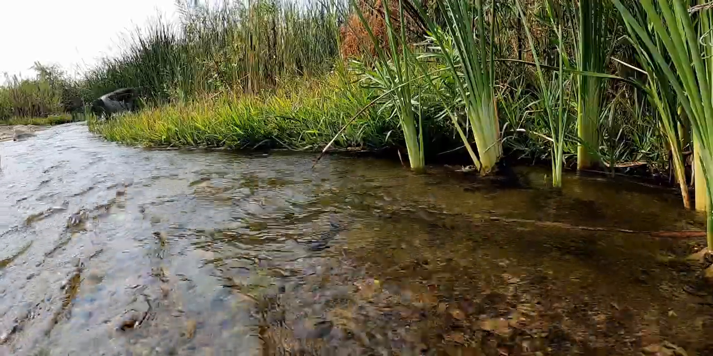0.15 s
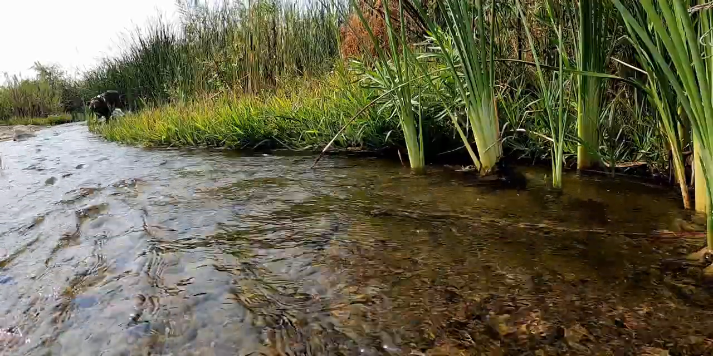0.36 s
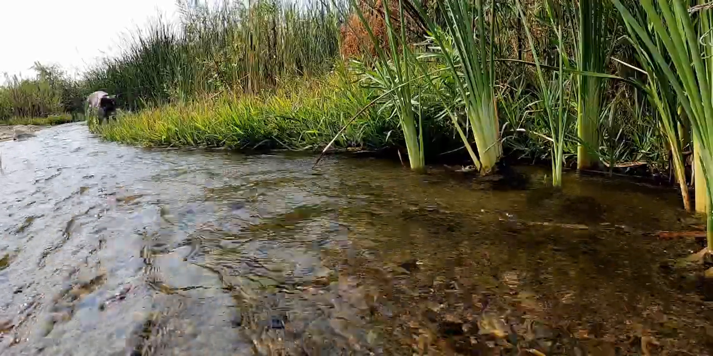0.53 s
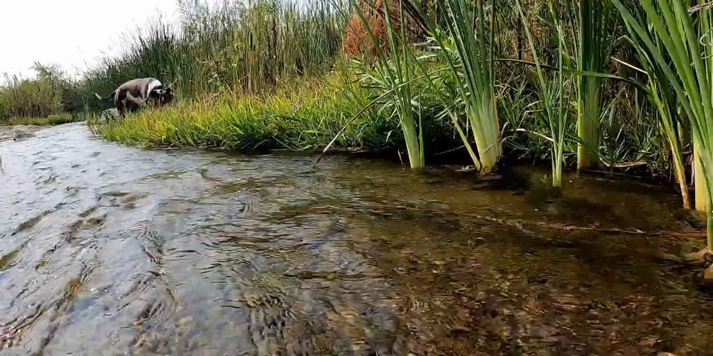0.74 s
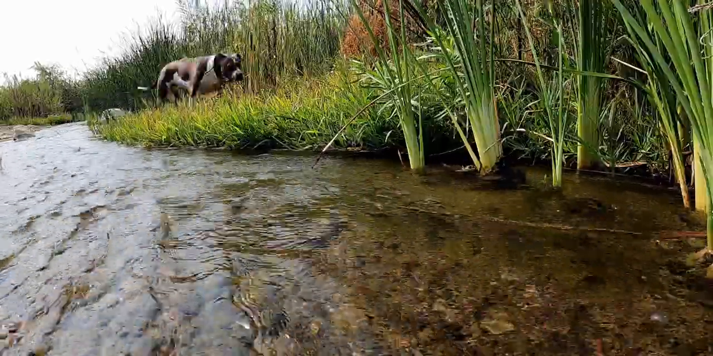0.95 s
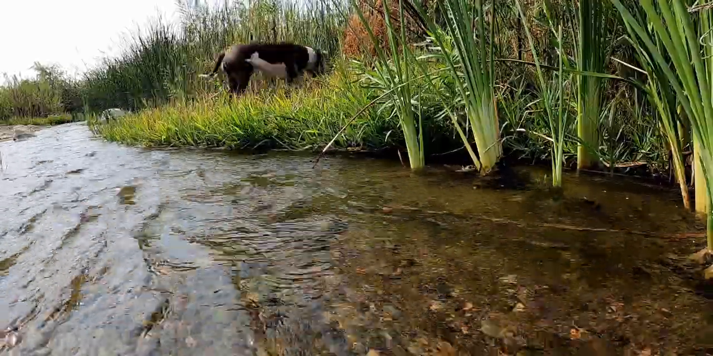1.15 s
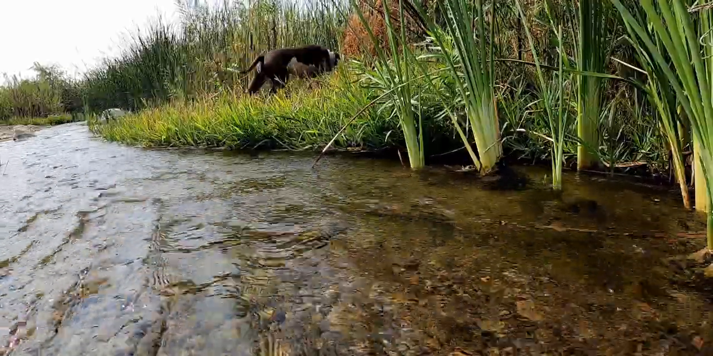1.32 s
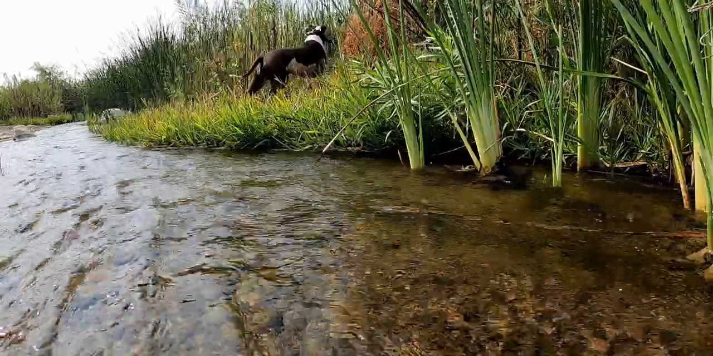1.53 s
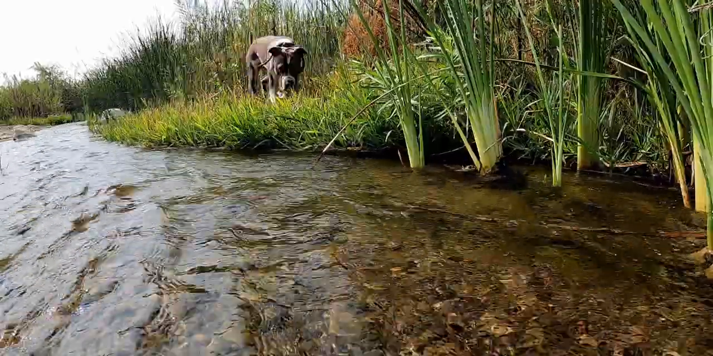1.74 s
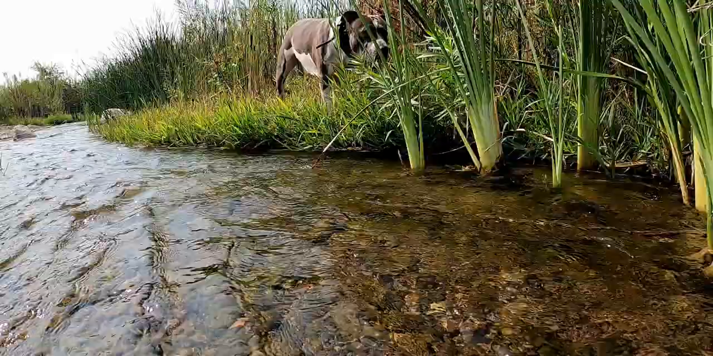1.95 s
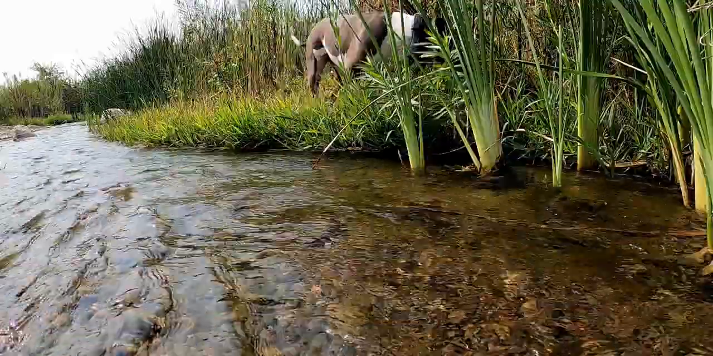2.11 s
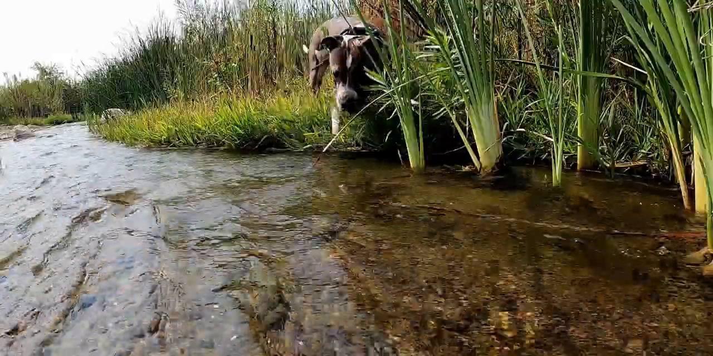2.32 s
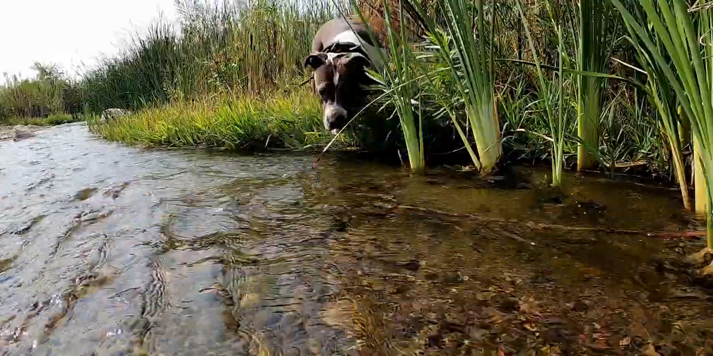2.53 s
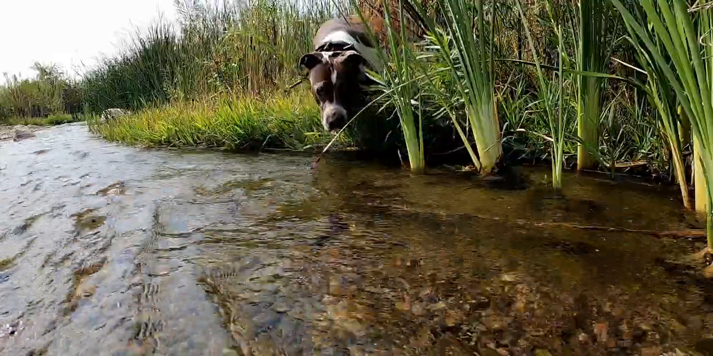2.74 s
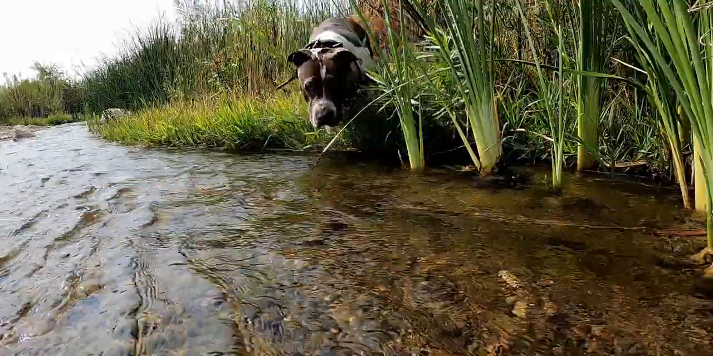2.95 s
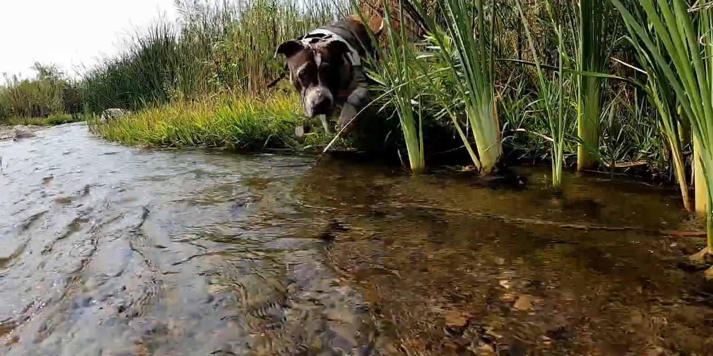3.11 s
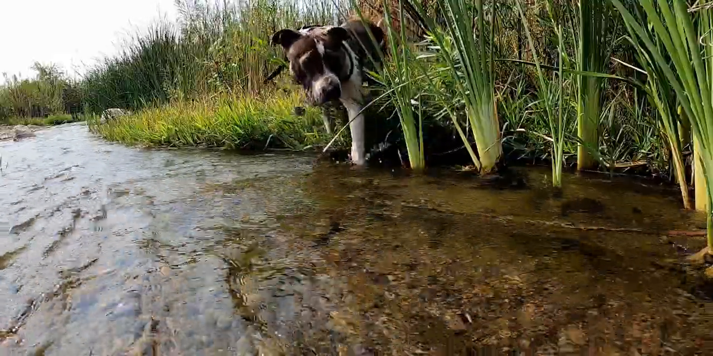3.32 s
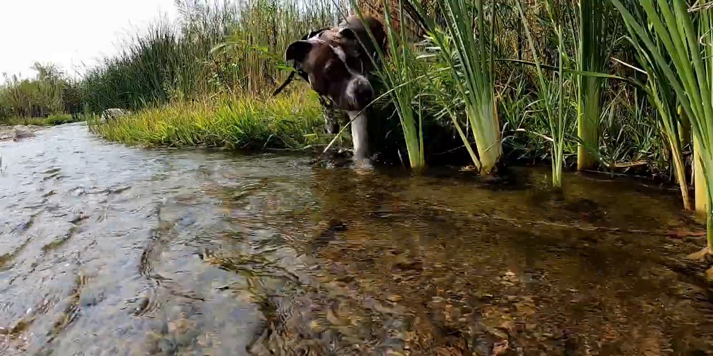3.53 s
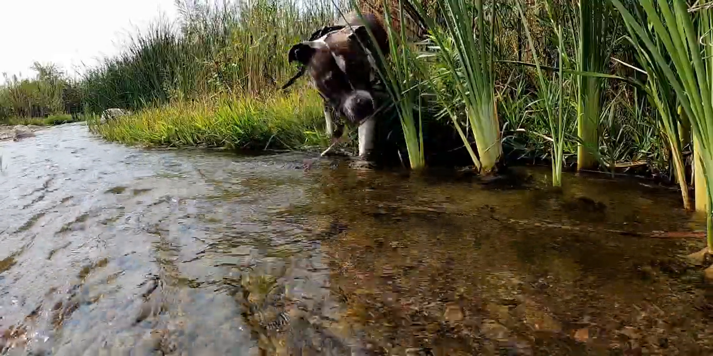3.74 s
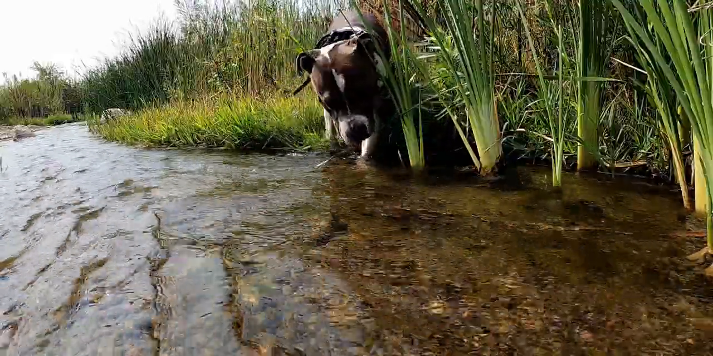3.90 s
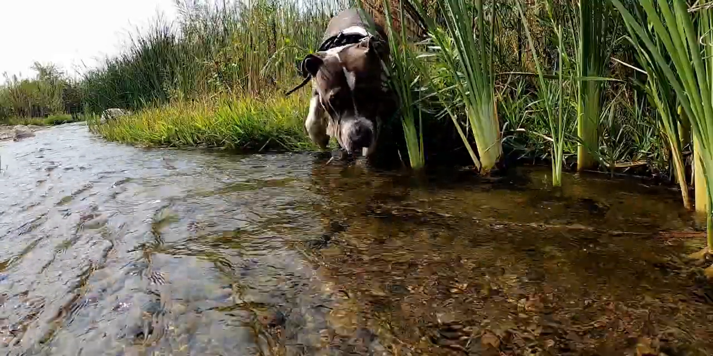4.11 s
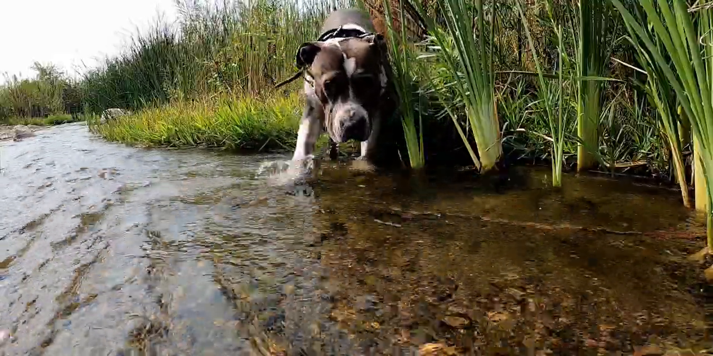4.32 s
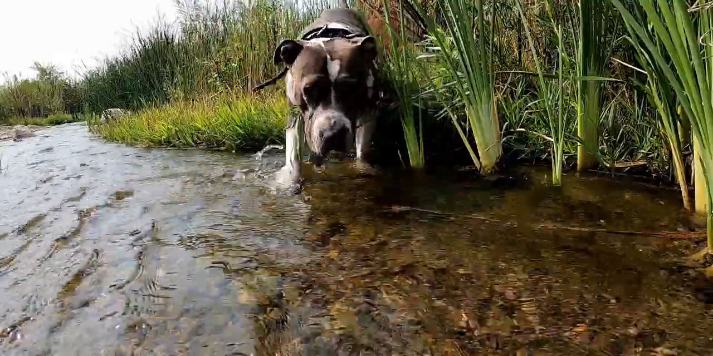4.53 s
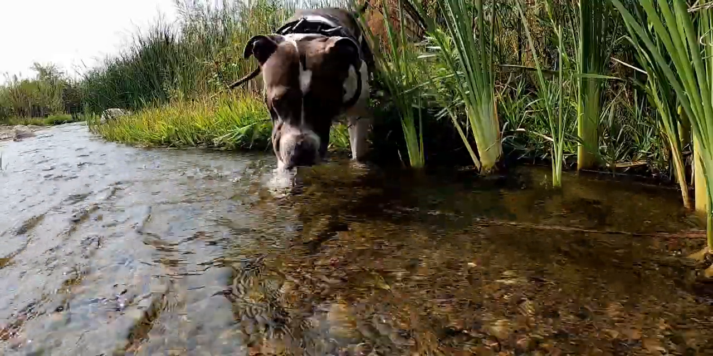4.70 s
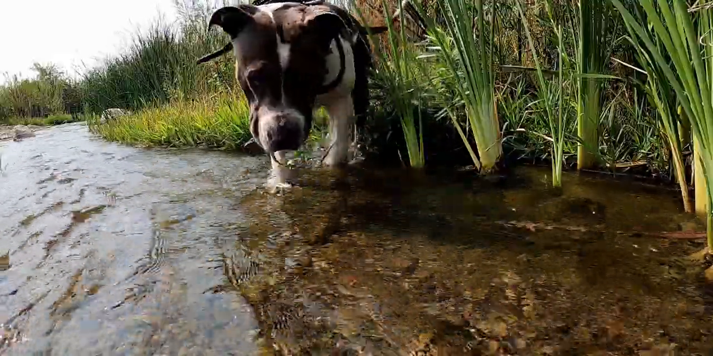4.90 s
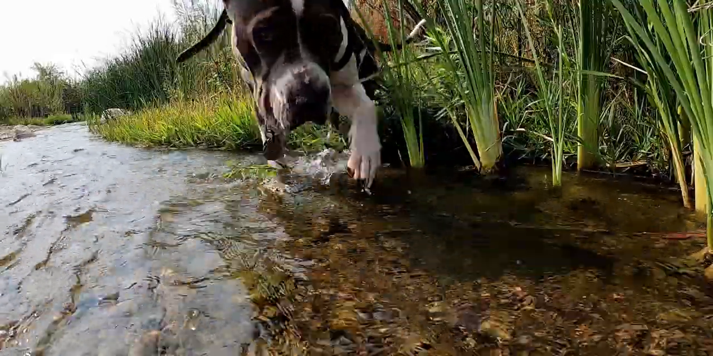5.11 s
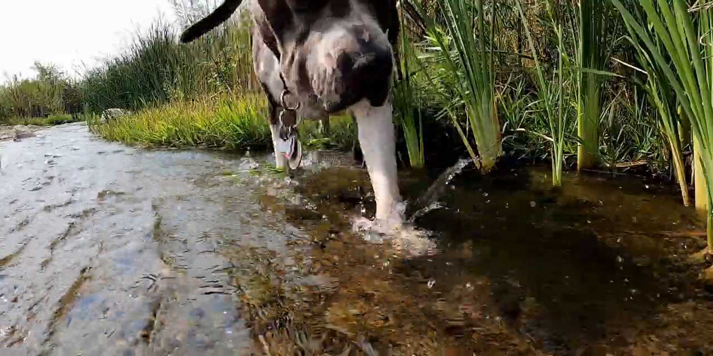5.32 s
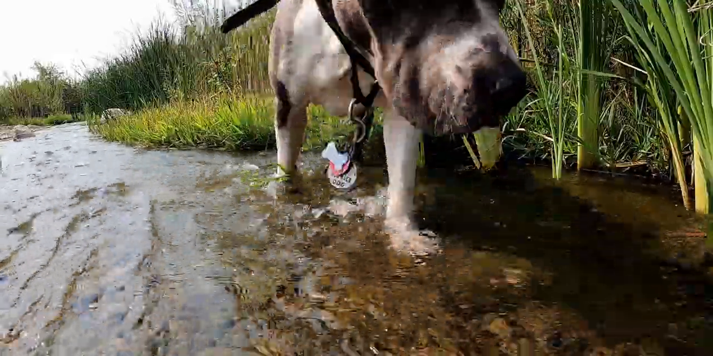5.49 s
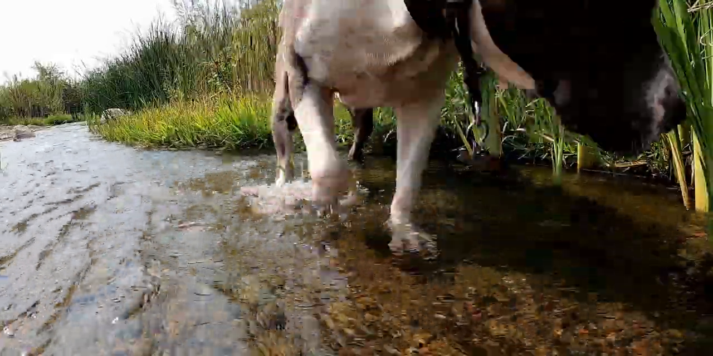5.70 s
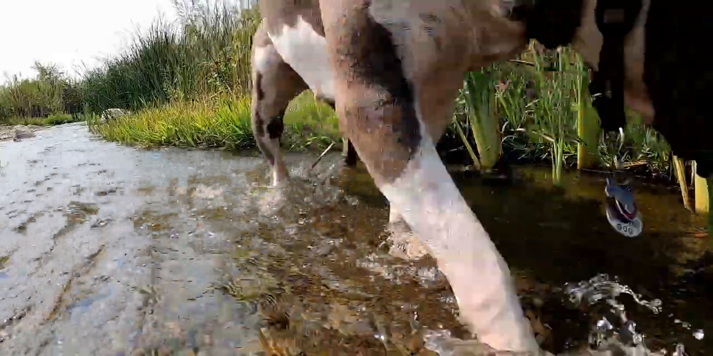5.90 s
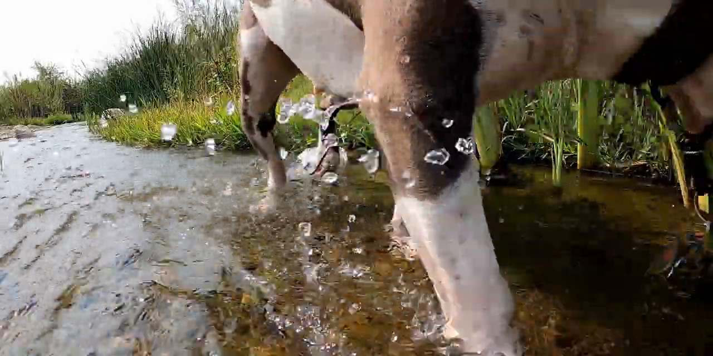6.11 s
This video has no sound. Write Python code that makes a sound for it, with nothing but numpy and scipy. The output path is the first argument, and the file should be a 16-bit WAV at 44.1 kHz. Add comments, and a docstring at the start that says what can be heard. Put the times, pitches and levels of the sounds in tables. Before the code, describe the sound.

Close outdoor pickup at the edge of a stony stream. Quiet trickling water and light early drips give way to grass and reeds being brushed, with soft wind bumps. Thin high tag jingles appear, then wet paw steps with popping bubbles, gurgles and crisp spray. Short lulls separate the first steps before the dog wades past in continuous, loud splashing.

```python
"""A shallow creek murmurs over stones (shaped noise and faint ringing bubbles) above a low wavering hum.
At first a dog's paws stir the water in sparse surges and plops; from about 0.9 s it brushes wet reeds,
and a light breeze thumps the microphone with short low swings. From 2.4 s its collar tag rings now and then
(damped high sines), and from 3.3 s it wades nearer: ringing bubbles, slosh and spray (clumped bubble
swarms and noise) grow until the end."""
import sys
import numpy as np
from scipy import signal
from scipy.fft import rfft, irfft, next_fast_len
from scipy.io import wavfile
from scipy.ndimage import uniform_filter1d, map_coordinates

SR = 44100
rng = np.random.default_rng(int(sys.argv[2]) if len(sys.argv) > 2 else 0)


def master_out(mix):
    """Clip the mix to full scale and print it as 16-bit PCM to the path in sys.argv[1]."""
    frames = np.transpose(np.atleast_2d(mix))
    ceiling = np.clip(frames, -1, 1)
    pcm = np.round(ceiling * 32767).astype(np.int16)
    wavfile.write(sys.argv[1], SR, pcm)


N = 271215  # length [samples]


def amp(db):
    """Gain of a level in dB."""
    return 10 ** (np.asarray(db) / 20)


def unit(x):
    """x at rms 1."""
    return x / np.sqrt(np.mean(x ** 2) + 1e-20)


def curves(rows):
    """One value per sample for each column after the time."""
    s, *cols = np.transpose(rows)
    return [np.interp(np.arange(N) / SR, s, col) for col in cols]


def wobble(rate):
    """A smooth random curve with `rate` knots a second."""
    knots = rng.standard_normal(int(N * rate / SR) + 4)
    return map_coordinates(knots, [np.arange(N) * rate / SR])


def filtered(x, response):
    """x times a response of frequency."""
    m = next_fast_len(N + 8192)
    gain = response(np.fft.rfftfreq(m, 1 / SR))
    return irfft(rfft(x, m) * gain, m)[..., :N]


def coloured(x, points):
    """x shaped by a (Hz, dB) curve, drawn on a log frequency axis, at rms 1."""
    f, db = np.transpose(points)
    return unit(filtered(x, lambda hz: amp(np.interp(np.log(hz + 1), np.log(f), db))))


def rush(points, patchy_db):
    """Shaped noise with patches of random gain in time and frequency."""
    z = signal.stft(rng.standard_normal(N), nperseg=256)[2]
    field = rng.standard_normal(z.shape)
    field = uniform_filter1d(uniform_filter1d(field, 5, 0), 9, 1)  # smooth over frequency, then time
    patchy = signal.istft(z * amp(patchy_db * unit(field)), nperseg=256)[1][:N]
    return coloured(patchy, points)


def rings(s, hz, db, t60, rise, size, onset=0.22, life=1):
    """Damped sines whose pitch can climb, as a bubble's does near the surface; they die faster after life [s]."""
    burst_t60 = 0.031  # s, decay added once a pocket has burst
    t = np.arange(size) / SR
    hz, db, t60, rise, onset, life = (np.reshape(v, (-1, 1)) for v in (hz, db, t60, rise, onset, life))
    turns = hz * t * (1 + 2.25 * np.clip(rise, 0, 3) * t / t60)
    fade_db = 60 * (t / t60 + np.maximum(t - life, 0) / burst_t60)
    attack = 1 - np.exp(-hz * t / onset)  # onset in cycles of the starting pitch
    wave = amp(db - fade_db) * np.sin(2 * np.pi * turns) * attack
    at = np.round(np.asarray(s) * SR).astype(int)[:, None] + np.arange(size)
    return np.bincount(at.ravel(), wave.ravel(), N + size)[:N]


def grains(count, hz, spread, cycles, scatter_db, size, rise=0.095):
    """A swarm of bubbles ringing at random moments, a few much louder than the rest, at rms 1."""
    when, loud, place = rng.random((count, 3)).T
    pitch = hz * np.exp(spread * (2 * place - 1))
    level_db = -scatter_db * np.log(loud + .02)
    return unit(rings(when * (N - 1) / SR, pitch, level_db, cycles / pitch, 0 * pitch + rise, size, onset=1.1))


def bursts(rows, t60):
    """White noise that starts within a millisecond or so and dies fast, for each (s, dB) row."""
    out, t = np.zeros(N + 2000), np.arange(2000) / SR
    for s, db in rows:
        envelope = amp(db - 60 * t / t60) * (1 - np.exp(-t / 0.001))
        out[round(s * SR):][:2000] += envelope * rng.standard_normal(2000)
    return out[:N]


def hum():
    """A faint low sine that wavers in pitch and comes and goes."""
    pitch_hz = 172 * np.exp(.08 * wobble(4) + .05 * wobble(30))
    return amp(-71.5 + 4.5 * wobble(9)) * np.sin(2 * np.pi * np.cumsum(pitch_hz) / SR)


def breeze():
    """Each push of air swings the microphone diaphragm out and back: a short low sine in a bell-shaped swell."""
    # air pushes: (centre time [s], envelope peak level [dB], pitch [Hz])
    puffs = [(0.955, -37.5, 63.2), (0.994, -46, 49.7), (2.064, -40.5, 71.6), (2.132, -31.5, 114),
             (2.159, -42.5, 48.7), (2.634, -39.5, 27.8), (2.679, -48, 33), (2.765, -53, 32),
             (2.98, -49, 31.8), (4.754, -49.5, 85)]
    puff_cycles = 1.33  # width of the swell where it is down to 1/e
    out, t = np.zeros(N), np.arange(N) / SR
    for s, db, hz in puffs:
        swell = np.exp(-(2 * hz * (t - s) / puff_cycles) ** 2)
        out += amp(db) * swell * np.sin(2 * np.pi * hz * (s - t))
    return out


def creek():
    """Running water: deep patchy noise murmurs, brighter noise hisses as ripples, faint bubbles ring."""
    # the flow over time: (time [s], murmur level [dB], ripple level [dB])
    flow = [(0, -60, -69), (.3, -71, -70), (.6, -63.5, -66), (1.5, -67, -66.5), (3.4, -64, -60),
            (4.2, -67.5, -64), (6.15, -62.5, -49)]
    # spectrum of the deeper water: (frequency [Hz], relative level [dB])
    deep = [(15, -66), (30, -3.5), (90, -10.5), (170, -1.5), (280, -6.5), (450, -20.5), (900, -58)]
    # spectrum of the ripple hiss: (frequency [Hz], relative level [dB])
    ripple_tone = [(300, -22), (600, 2.5), (850, 0.5), (1100, 5.5), (3200, 2.5), (7200, -3.5), (8500, -12),
                   (16000, -29)]
    murmur_db, ripple_db = curves(flow)
    murmur = amp(murmur_db + 1.8 * wobble(6)) * rush(deep, patchy_db=2.5)
    bubbles = grains(count=160, hz=1500, spread=.7, cycles=45, scatter_db=3.4, size=1200, rise=.35)
    ripples = rush(ripple_tone, patchy_db=1.5) + .5 * bubbles
    return murmur + amp(ripple_db + 1.26 * wobble(6.0)) * ripples


def banks(x):
    """Reeds and banks scatter a short, diffuse answer: a delayed noise tail with a t60 of 35 ms."""
    t = np.arange(SR // 8) / SR
    tail = rng.standard_normal(len(t)) * amp(-60 * t / 0.035)
    return signal.fftconvolve(np.pad(x, (120, 0)), tail / np.linalg.norm(tail))[:N]


def ticks():
    """Reed stems and flying drops tick: dry noise bursts kept to the treble."""
    # sharp ticks: (time [s], level before filtering [dB])
    tick_rows = [(0.339, -36), (0.698, -27.5), (1.0034, -34), (2.4089, -32.5), (2.9633, -24), (2.994, -20),
                 (3.0091, -19), (3.177, -17), (3.395, -21), (3.6057, -14), (4.082, -28.5), (4.248, -14),
                 (4.526, -23), (4.5345, -13), (5.053, -18), (5.258, -10.5), (5.541, -21.5)]
    clicks = bursts(tick_rows, t60=.011)
    return filtered(clicks, lambda f: (f / 4000) ** 2 / (1 + (f / 4000) ** 2) / (1 + (f / 8000) ** 6))


def collar():
    """Each strike clicks and rings the thin metal tag; its swinging makes the ring waver."""
    # tag strikes: (time [s], base level of ring and click [dB])
    strikes = [(2.427, -72), (3.1053, -51.5), (3.1797, -62), (3.273, -51.5), (4.2423, -62), (4.727, -52.5),
               (6.114, -48)]
    # modes of the tag: (pitch [Hz], level relative to the strike [dB], t60 [s])
    modes = [(8945, 5.5, .2), (15050, -20, .18)]
    # a smaller metal piece rings once: (time [s], pitch [Hz], starting level [dB], t60 [s])
    ping = (3.182, 5640, -42, .07)
    s, level = np.transpose(strikes)
    ring = sum(rings(s, hz + 0 * s, level + db, t60 + 0 * s, 0 * s, size=9000) for hz, db, t60 in modes)
    swing = amp(2.8 * wobble(60))
    click = filtered(bursts(strikes, t60=0.01), lambda f: f / (f + 5000) / (1 + (f / 11000) ** 5))
    return swing * ring + amp(28.0) * click + rings(*np.transpose([ping]), [0], size=4000)


def drops():
    """Slaps plop briefly, trapped bubbles ring on, and air pockets climb in pitch until they burst."""
    # flung water slapping the surface: (time [s], pitch [Hz], starting level [dB])
    slaps = [(.341, 3550, -34), (0.529, 3000, -30.5), (0.578, 1635, -30.5), (.666, 1040, -32.5),
             (.675, 2090, -27.5), (0.699, 2100, -26), (0.7, 3400, -23), (.744, 1390, -36),
             (1.038, 418, -46.5), (1.198, 4000, -43), (2.716, 647, -41.5), (2.73, 2870, -33),
             (2.1847, 3450, -29.5), (3.277, 3500, -18), (3.2962, 2770, -26), (3.3753, 937, -25.5),
             (3.4195, 2260, -14.5), (3.517, 2730, -14), (3.607, 1770, -16), (3.71, 1610, -38),
             (4.4145, 1880, -15.5), (4.467, 1060, -18), (4.478, 1120, -21), (4.489, 1250, -16),
             (4.499, 1420, -13), (4.621, 1575, -25.5), (4.998, 1090, -19), (5.04, 3490, -14),
             (5.114, 1200, -25), (5.125, 920, -18), (5.131, 1780, -16.5), (5.155, 2830, -16.5),
             (5.2532, 2700, -12.5), (5.2961, 1288, -12.5), (5.3277, 1290, -13), (5.3529, 1200, -13.5),
             (5.3535, 2480, -9), (5.36, 630, -16.5), (5.4501, 2930, -6), (5.562, 2530, -22.5),
             (5.6035, 3460, -10.5), (5.611, 2610, -15), (5.673, 918, -22), (5.6939, 1420, -11.5),
             (5.743, 843, -17), (5.795, 490, -27), (5.821, 940, -13.5), (5.82, 493, -20.5),
             (5.8342, 395, -24), (5.841, 996, -23), (5.874, 3210, -12), (5.898, 2010, -24),
             (5.977, 1640, -13), (5.996, 557, -19.5), (6.0341, 996, -9.5), (6.035, 366, -21.5),
             (6.0367, 3600, -8.5), (6.043, 1720, -9), (6.087, 3240, -4), (6.091, 3150, -10.5)]
    # trapped bubbles that ring on: (time [s], pitch [Hz], starting level [dB])
    trapped = [(0.414, 1025, -44), (0.4971, 1740, -31), (1.42, 1350, -51.5), (2.507, 498, -47.5),
               (2.508, 1510, -43), (3.027, 1300, -40.5), (3.3176, 2357, -32), (3.339, 1040, -41),
               (3.4195, 2270, -20), (3.58, 1400, -36.5), (3.614, 1890, -19), (3.678, 980, -36.5),
               (3.718, 1670, -38), (3.862, 718.5, -46.5), (4.2655, 2200, -31.5), (4.296, 1535, -33),
               (4.329, 3050, -23.5), (4.534, 3460, -29), (4.9468, 1005, -29.5), (5.004, 960, -29.5),
               (5.269, 2850, -21), (5.6109, 1604, -19), (5.866, 485, -36), (5.926, 1164, -31),
               (5.997, 2770, -19), (6.0137, 999, -21.5), (6.105, 1050, -29), (6.1114, 4090, -17.5)]
    # air pockets closing behind a paw: (time [s], starting pitch [Hz], starting level [dB], t60 [s],
    # pitch rise while fading 13 dB [share], life until it bursts [s])
    gulps = [(.403, 1300, -46.5, 0.057, .5, 0.0092), (0.71, 680, -38, 0.084, 1.5, 0.0084),
             (1.981, 1026, -51.5, 0.142, 0.5, .04), (3.51, 1247, -35, 0.092, 1.3, 0.0084),
             (3.727, 480, -33, 0.19, 0.35, 0.056), (3.801, 798, -30, 0.1, 1.2, 0.016),
             (5.035, 447.4, -27.5, 0.048, 1.3, .02), (5.07, 780, -34, 0.21, 0, 0.024),
             (5.162, 752, -28.5, 0.194, 1.45, 0.022), (5.35, 240, -24.5, 0.13, 0, 0.082),
             (5.414, 596, -29, 0.14, 1.0, 0.031), (5.629, 599, -30, 0.11, 0.3, 0.0324)]
    slap_cycles, bubble_cycles = 15, 45  # cycles until 60 dB down
    s, hz, db = np.transpose(slaps + trapped)
    t60 = np.repeat([slap_cycles, bubble_cycles], [len(slaps), len(trapped)]) / hz
    out = rings(s, hz, db, t60, 0 * s + 0.017, size=2000, onset=0.9)
    # each drags three quieter, mostly higher bubbles after it
    for late, pitch, quiet in rng.random((len(s), 3, 3)).T:
        small_hz = hz * (.8 + 1.3 * pitch)
        small_db = db - 13.5 - 9 * quiet
        out += rings(s + 0.0084 * late, small_hz, small_db, 18 / small_hz, 0 * s + 0.08, size=1200)
    *pocket, rise, life = np.transpose(gulps)
    swell = 0.77 + 4 * rise  # cycles: the faster a pocket rises, the later it is loudest
    shaken = amp(2.5 * wobble(130))  # the surface above a pocket never lies still
    return out + shaken * rings(*pocket, rise, size=7000, onset=swell, life=life)


def surges():
    """Strength of slosh, gurgle and spray: each surge swells, holds, then settles; long ones do so slowly."""
    # paws and legs stirring the water; deep plunges gurgle most:
    # (time of full strength [s], hold [s], slosh level before mixing [dB], gurgle relative to slosh [dB])
    splashes = [(0.386, 0.063, -61.5, -6.5), (0.494, 0.016, -53, -1.5), (0.577, 0.037, -58.5, 1),
                (0.664, 0.00465, -50, 5), (0.738, 0.04, -51.5, -19.5), (1.222, 0.017, -58.5, -7),
                (1.305, 0.014, -57, -7.5), (2.584, 0.014, -56, 3.5), (2.668, 0.0562, -59.5, 0),
                (3.289, 0.03, -47, -14), (3.4, 0.14, -51.5, -10), (3.61, 0.0071, -36.5, -30),
                (3.658, 0.083, -53.5, -7), (4.248, 0.018, -44, -44), (4.289, 0.025, -43.5, -36),
                (4.337, 0.0526, -41.5, -49.5), (4.412, 0.014, -42, 1.5), (4.491, 0.015, -39, 4.5),
                (4.497, 0.24, -53.5, 1.5), (4.938, 0.036, -38.5, -12.5), (5.009, 0.059, -41.5, 4),
                (5.104, 0.068, -40, -1.5), (5.22, 0.099, -40.5, -41), (5.257, 0.03, -32.5, -7.5),
                (5.345, 0.012, -41.5, 11), (5.378, 0.055, -43.5, -1.5), (5.513, 0.039, -42.5, -23),
                (5.602, 0.012, -32.5, -21), (5.665, 0.1375, -41.5, 1.5), (5.855, 0.07, -30.5, -44),
                (5.942, 0.051, -34.5, -16), (6.05, 0.022, -45, 5.5), (6.1, 0.054, -47, 3)]
    # wet reeds brushed by the dog:
    # (time of full strength [s], hold [s], level before mixing [dB], treble relative to that [dB])
    rustles = [(0.885, 0.029, -60, -5.5), (1.682, 0.067, -59, -2), (1.797, 0.1, -61.5, -4),
               (1.967, 0.16, -61.5, 0), (2.268, 0.088, -64, 0.5), (2.454, 0.025, -56, -3.5),
               (2.823, 0.296, -58.5, 1), (2.957, 0.088, -58, 8.5), (3.277, 0.0118, -48, 1),
               (3.384, 0.014, -46, -4), (3.743, 0.14, -59, 2), (4.006, 0.22, -60.5, -0.5),
               (4.744, 0.16, -52.5, -2.5)]
    splash_spray_db, rustle_gurgle_db = -8.5, -18.5  # relative to the slosh, before mixing
    swell_s, swell_share = 0.0019, 0.49  # shortest swell [s]; seconds added per second of hold
    settle_s, settle_share = 0.086, 1.67  # shortest t60 [s]; seconds added per second of hold
    rows = [(*row, splash_spray_db) for row in splashes]
    rows += [(*row, rustle_gurgle_db, treble) for *row, treble in rustles]
    power, t = np.zeros((3, N + SR)), np.arange(SR) / SR
    for s, length, slosh_db, gurgle_db, spray_db in rows:
        lead = swell_s + swell_share * length
        swell = np.clip(t / lead, 0, 1) ** 2
        settle = amp(-60 * np.maximum(t - lead - length, 0) / (settle_s + settle_share * length))
        level = amp(slosh_db + np.array([[0], [gurgle_db], [spray_db]]))
        power[:, round((s - lead) * SR):][:, :SR] += (level * swell * settle) ** 2
    return np.sqrt(power[:, :N])


def wading():
    """Stirred water and reeds: big bubbles gurgle, small ones fizz in clumps, droplets crackle."""
    # spectrum of the slosh noise: (frequency [Hz], relative level [dB])
    slosh_tone = [(700, -37), (1200, -15), (2200, -14), (3200, 12), (5000, 6.5), (7300, -61)]
    # spectrum of the spray: (frequency [Hz], relative level [dB])
    spray_tone = [(3500, -10), (6000, 0), (7300, 1.5), (8200, -4.5), (12000, -14.5), (16000, -30)]
    slosh_gain, gurgle_gain, spray_gain = surges()
    clump = amp(2.2 * wobble(120))
    gurgle = grains(count=4200, hz=780, spread=.8, cycles=19, scatter_db=3, size=800, rise=.2)
    burble = grains(count=5000, hz=1783, spread=0.526, cycles=23.0, scatter_db=4.0, size=340)
    fizz = grains(count=5500, hz=3372, spread=0.59, cycles=29.3, scatter_db=4.0, size=300)
    # sparse random impulses of scattered strength
    crackle = rng.standard_normal(N) * (rng.random(N) < .03) * amp(3 * rng.standard_normal(N))
    slosh = .7 * fizz + .3 * rush(slosh_tone, patchy_db=6)
    spray = .5 * coloured(crackle, spray_tone) + 0.49 * rush(spray_tone, patchy_db=-4.5)
    # middle-sized bubbles need both churning and depth
    burble_gain = np.sqrt(gurgle_gain * slosh_gain)
    low = gurgle_gain * amp(-4.5) * gurgle + burble_gain * amp(2.0) * burble
    high = slosh_gain * amp(1.5) * slosh + spray_gain * amp(-1.5) * spray
    return low + clump * high


def scene():
    """Dog and creek before one microphone; the banks answer the drops, ticks and collar."""
    plops = filtered(drops(), lambda f: f ** 2 / (f ** 2 + 150 ** 2))  # small bubbles radiate no bass
    near = plops + ticks() + collar()
    return (near + amp(-7.0) * banks(near) + wading() + creek() + hum() + breeze())[None]


def record(dry):
    """Keep nothing above the band limit."""
    top_hz = 15900
    return filtered(dry, lambda hz: hz < top_hz)


dry = scene()
out = record(dry)
master_out(out)
```